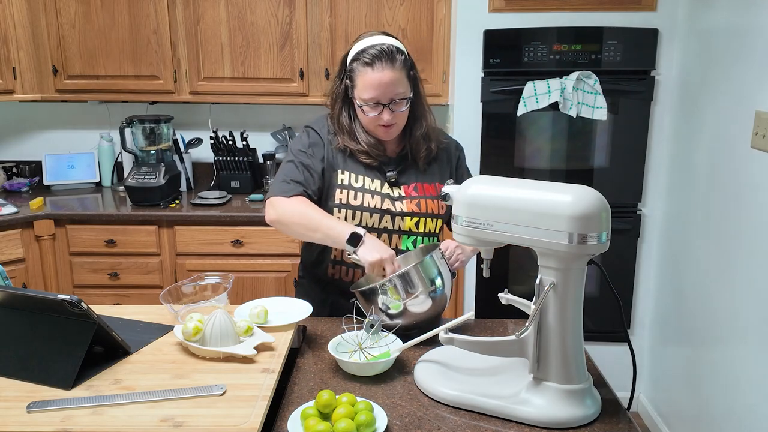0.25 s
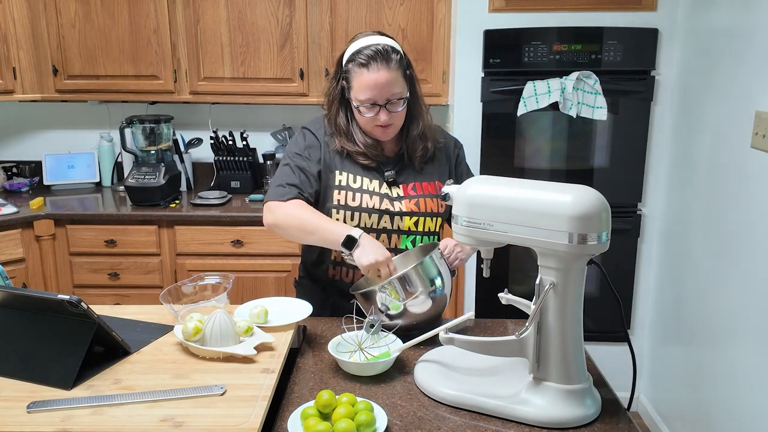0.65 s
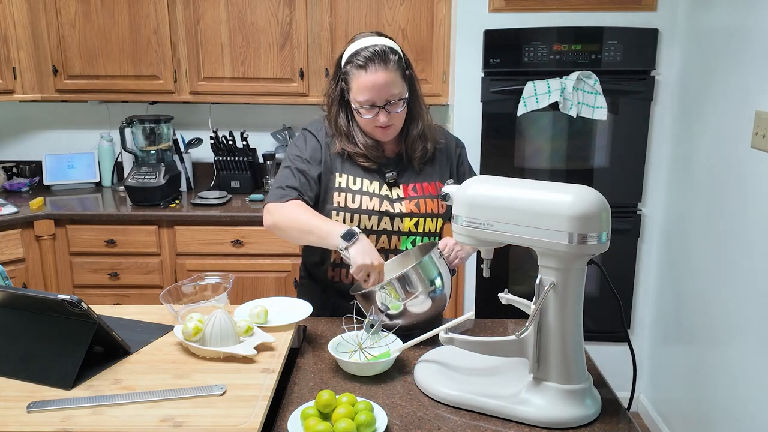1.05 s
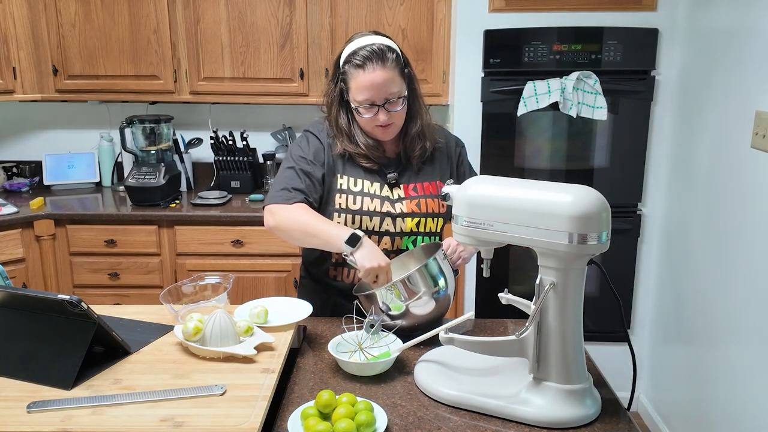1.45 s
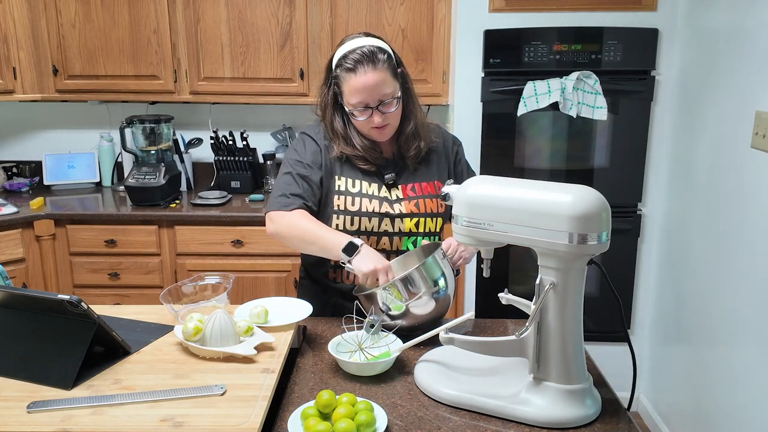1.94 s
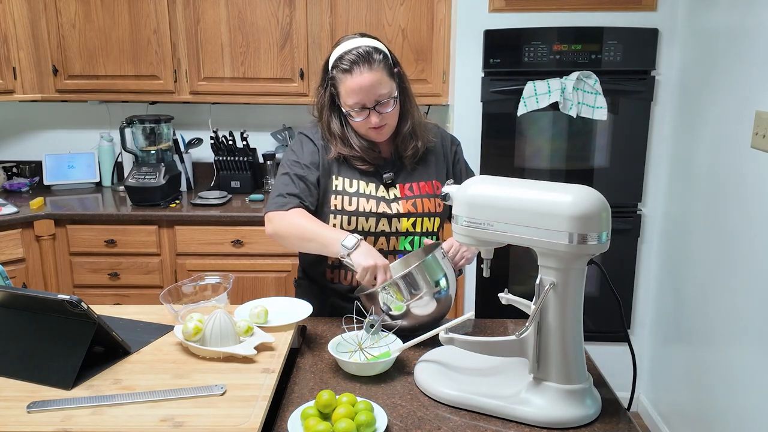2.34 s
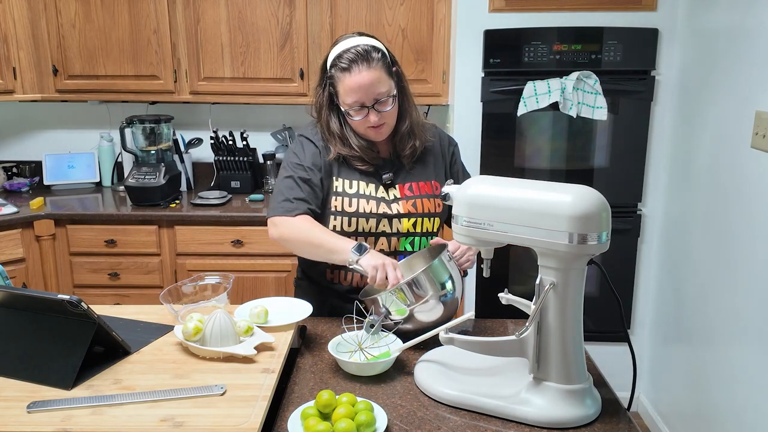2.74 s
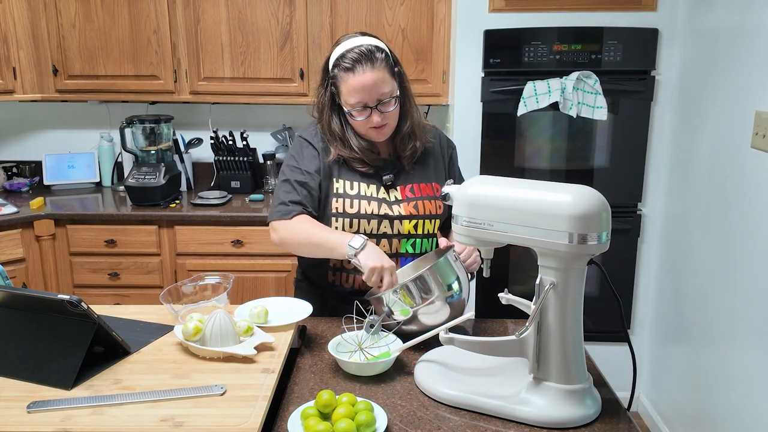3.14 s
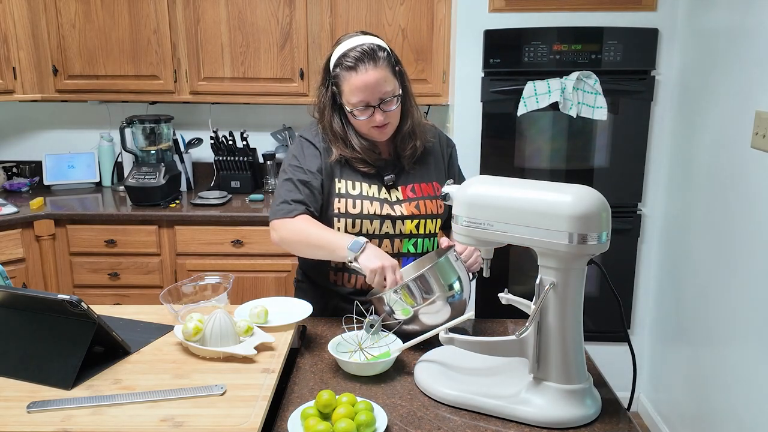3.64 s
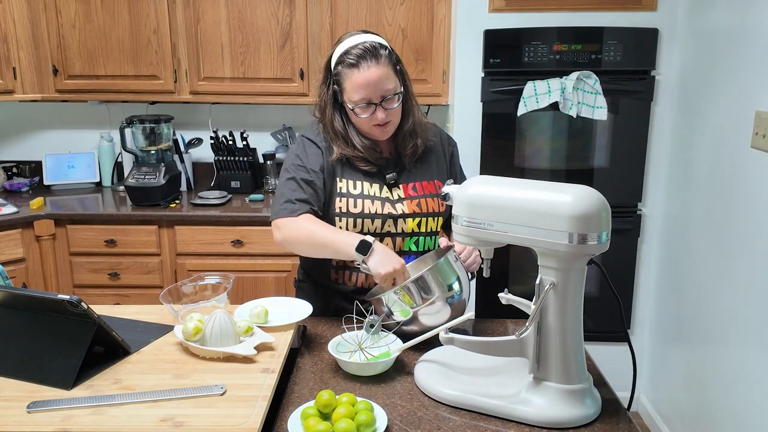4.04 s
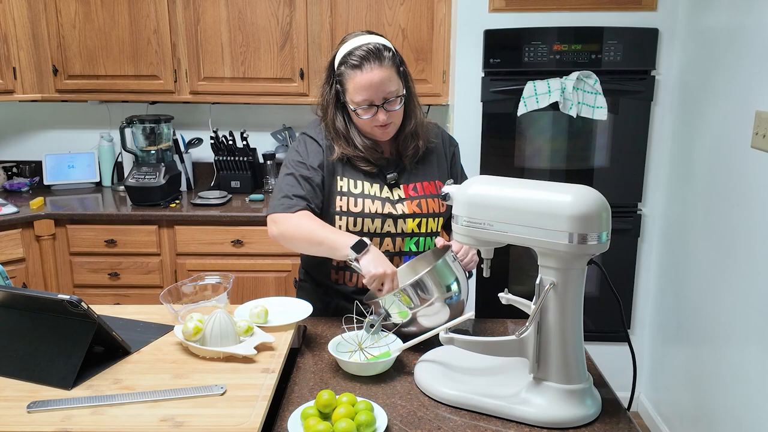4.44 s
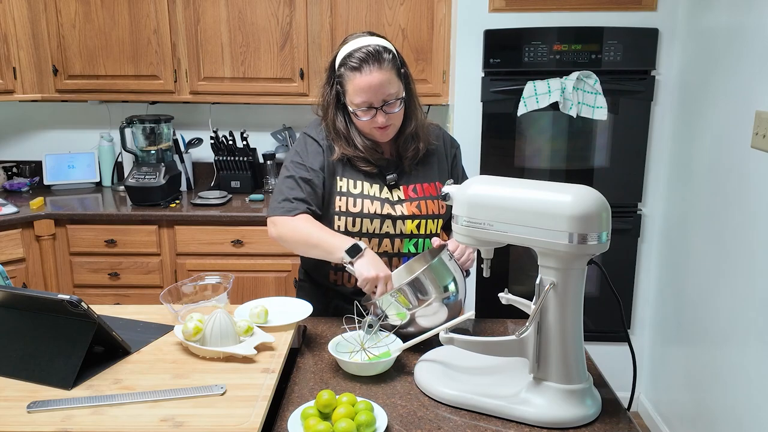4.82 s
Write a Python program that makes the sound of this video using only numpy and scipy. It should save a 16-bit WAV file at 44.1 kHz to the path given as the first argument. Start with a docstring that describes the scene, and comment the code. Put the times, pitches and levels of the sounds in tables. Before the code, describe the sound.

A wire whisk rapidly beats egg in a metal bowl, with rattling clinks, dull thuds and wet slaps in a small kitchen.

```python
"""A wire whisk beats eggs in a stainless steel bowl, in a home kitchen, for about five seconds.
From the start, quick blows of rattling wires make the bottom thud, the egg slap and the steel clink,
with sliding wires in between. Just before 3 s there is a deep bump, then mostly clinks and long sweeps;
wet slaps return near 3.9 s, and the strongest clink comes near the end. Each blow sets off resonances.
Bubbles pop all along, the room answers briefly, and soft air noise and a faint hum lie beneath."""
import sys
import numpy as np
from scipy import signal
from scipy.fft import rfft, irfft, next_fast_len
from scipy.io import wavfile

SR = 44100
rng = np.random.default_rng(int(sys.argv[2]) if len(sys.argv) > 2 else 0)


def store_pcm(level_fs):
    """Save levels as 16-bit WAV."""
    pcm = np.round(np.clip(level_fs, -1, 1) * 32767).astype(np.int16)
    wavfile.write(sys.argv[1], SR, np.atleast_2d(pcm).T)


N = 223975

# Ways the steel wall can ring. Each row: pitch in Hz, relative level in dB,
# time in seconds for its free ring to fall by 60 dB.
STEEL_MODES = [(1028, 11, 0.5), (1100, 16, 0.47), (1110, 5, 0.9), (1785, 19, 0.05), (2020, 13, 0.16),
               (2413, 18.5, 0.077), (2910, 11.5, 0.081), (3208, 20.5, 0.14), (3353, -3.5, 0.31),
               (4104, 11.5, 0.24), (5100, -35, 0.26), (4960, 5.5, 0.24), (5620, 0, 0.47), (5960, -15, 0.42),
               (6413, 13, 0.12), (6570, 10.5, 0.78), (7030, 5.5, 0.16), (6880, 17, 0.09), (7370, 5, 0.19),
               (8050, -34, .15), (8830, -1.5, 0.19), (8660, -27, .2), (10000, -42, .14)]
# Tone colours of a tick on steel, a slap in the egg, the thudding bottom, the clanking wall
# and the still air. Each row: frequency in Hz, relative level in dB.
TICK_COLOUR = [(1500, -56), (3400, -15.5), (4400, -8.5), (5200, 3), (6000, 0.5), (6800, -6), (8000, -4.5),
               (9800, -14.5), (13500, -14), (16000, -26.5)]
SLAP_COLOUR = [(40, -66), (130, -35), (205, 8), (290, -6), (380, 6), (600, -6), (770, -11.5), (1100, 1),
               (1600, -9), (2200, -5), (2760, -12.5), (3500, -15), (4600, -26), (6600, -49.5),
               (9000, -22.5), (16000, -31.5)]
BOTTOM_COLOUR = [(30, -94), (90, -3), (155, -19), (200, 7), (245, -6), (285, -9), (345, 2), (470, -2),
                 (590, -2.5), (740, -17.5), (1400, -69.5)]
CLANK_COLOUR = [(700, -47), (2200, -13), (2700, -19), (3050, -25.5), (3450, 3), (3900, -7.5), (4400, -32.5),
                (6000, -22), (12000, -63)]
AIR_COLOUR = [(25, -17), (60, -15), (130, -6.5), (200, 6.5), (293, -6.5), (420, 2.5), (714, -9.5),
              (1100, -9.5), (2500, -25), (4400, -23), (6700, -23.5), (9000, -33), (16000, -52.5)]
# Hum of an appliance. Each row: frequency in Hz, relative level in dB.
HUM_TONES = [(121, -77), (242, -68.5)]
# How long the room rings. Each row: frequency in Hz, time in seconds to fall by 60 dB.
ROOM_RING = [(150, 0.4), (400, 0.27), (1000, 0.28), (3000, 0.35), (7000, 0.37), (11000, 0.39),
             (16000, 0.26)]
# The wires hit bare steel. Each row: start in seconds, chatter length in seconds,
# clink and thud (both relative levels in dB), thud pitch in Hz.
CLINK_HITS = [(0.002, 0.0074, -45.5, -49.5, 400), (0.195, 0.014, -47, -49, 447),
              (0.322, 0.019, -51, -45, 447), (0.401, 0.0049, -39.5, -43.5, 378),
              (0.444, 0.026, -50, -44, 398), (0.631, 0.0046, -53, -42, 372), (0.64, 0.008, -38.5, -39, 392),
              (0.809, 0.015, -78, -44.5, 440), (0.847, .022, -40, -48.5, 403),
              (1.083, 0.021, -56, -45.5, 415), (1.211, 0.014, -43.5, -52, 435),
              (1.301, 0.006, -38.5, -42, 423), (1.438, 0.0104, -56.5, -55.5, 350),
              (1.4595, 0.0056, -38, -45, 335), (1.841, 0.013, -58, -48, 352),
              (2.014, 0.0088, -41.5, -45, 419), (2.221, 0.0076, -46.5, -42, 386),
              (2.320, 0.0046, -45.5, -53, 387), (2.582, 0.0038, -30.5, -30, 447),
              (2.587, 0.016, -40, -49, 453), (2.782, 0.016, -46, -49.5, 428),
              (3.091, 0.0043, -46.5, -43, 422), (3.0967, 0.0027, -38, -42, 400),
              (3.153, 0.011, -47.5, -52, 450), (3.344, 0.004, -47, -45, 374),
              (3.386, 0.0091, -36.5, -45, 422), (3.619, .017, -38, -39.5, 442),
              (3.641, 0.0085, -41.5, -39.5, 516), (3.785, 0.0053, -28, -74, 445),
              (3.793, 0.0083, -50.5, -38, 345), (4.018, 0.0024, -53, -47, 352),
              (4.030, 0.0066, -45.5, -45, 345), (4.223, 0.011, -44, -47.5, 417),
              (4.478, 0.0016, -57, -54, 364), (4.917, 0.0021, -24.5, -34.5, 372)]
# The wires plunge into the egg. Each row: start in seconds, chatter length in seconds,
# slap, steel and thud (all relative levels in dB), thud pitch in Hz, middle slap pitch in Hz.
EGG_HITS = [(0.06, 0.018, -34, -46, -40.5, 380, 1670), (0.257, 0.0087, -34.5, -42.5, -38, 381, 1600),
            (0.516, 0.0026, -38.5, -38.5, -34, 405, 1290), (0.706, 0.01, -45.5, -43, -33.5, 464, 1100),
            (0.869, 0.0043, -43.5, -65, -56, 377, 1700), (1.219, .008, -41.5, -60, -48, 405, 1875),
            (1.513, 0.0051, -42, -73, -61, 370, 1500), (1.523, 0.0095, -48.5, -51, -38, 406, 1430),
            (1.658, 0.0023, -45, -61, -43, 352, 1670), (1.716, 0.006, -36.5, -42, -39, 454, 1496),
            (1.73, 0.016, -51, -49, -41, 404, 1070), (1.888, 0.013, -42.5, -57, -40.5, 384, 1510),
            (1.915, 0.0077, -39, -42.5, -66, 376, 1610), (1.938, 0.012, -47, -48.5, -49, 400, 1080),
            (2.084, 0.019, -37.5, -51, -35, 337, 1420), (2.102, 0.015, -34, -41, -57, 332, 1640),
            (2.458, 0.0044, -31.5, -44.5, -39, 340, 1600), (2.537, 0.0041, -44.5, -54, -60, 358, 1280),
            (2.546, 0.0098, -50.5, -55, -62, 395, 1680), (2.903, 0.0065, -44.5, -48, -46, 338, 1620),
            (3.859, 0.0074, -42.5, -43.5, -46, 360, 1480), (3.871, .012, -45.5, -49, -45, 418, 2060),
            (4.087, 0.0072, -36.5, -43.5, -43, 363, 1560), (4.123, 0.0052, -39, -44, -56, 426, 1530),
            (4.362, 0.0062, -51, -51, -78, 382, 1930), (4.517, 0.012, -49.5, -62, -51, 515, 1660),
            (4.577, 0.0042, -38, -48.5, -36, 457, 1370), (4.718, 0.0059, -36, -56, -48, 430, 1006),
            (4.727, 0.007, -41, -43, -43.5, 493, 1560), (4.792, 0.0047, -38.5, -41.5, -33, 446, 1870),
            (4.879, .007, -37, -52, -41.5, 508, 1070), (4.968, 0.0056, -45.5, -48, -40.5, 446, 1410)]
# Long sweeps along the wall. Each row: start in seconds, length in seconds,
# steel, egg and thud (all relative levels in dB).
WALL_SWEEPS = [(0.084, .042, -51, -46, -56), (0.342, 0.037, -51.5, -62, -62),
               (0.468, 0.055, -57, -53, -48.5), (0.659, 0.046, -48, -54, -58),
               (0.822, 0.021, -46.5, -65, -51.5), (0.883, 0.034, -53.5, -56, -60),
               (2.284, 0.084, -59, -64.5, -54.5), (2.475, 0.048, -60, -57, -52),
               (2.827, 0.032, -47.5, -72, -71), (2.89, 0.016, -62, -61, -50),
               (3.132, 0.067, -55.5, -65.5, -51), (3.355, 0.042, -55, -77, -50),
               (3.406, .078, -50, -71.5, -52), (3.653, 0.041, -54, -72, -49), (4.044, 0.029, -55, -66, -53),
               (4.303, .063, -62, -56.5, -59), (4.534, 0.032, -53.5, -48, -65),
               (4.746, .045, -59.5, -56, -74), (4.896, 0.03, -57, -50.5, -50)]

RING = np.arange(SR // 4) / SR  # time axis of one ring, in seconds
TOP_HZ = 16100  # nothing sounds above this
CLANK_DB = -3  # the wall's clank, against the mean of clink and slap
# Egg clinging to the wires in a clink: level against the mean of clink and thud, and pitch
SPLASH_DB, SPLASH_HZ = -11.5, 1966
# Slaps harder than this have a soft entry and carry on along the wall
HARD_SLAP_DB = -44.5
# The leading wire enters the egg just ahead: seconds, and levels against the slap's own
ENTRY_S, ENTRY_EGG_DB, ENTRY_STEEL_DB, ENTRY_THUD_DB = 0.005, -9.5, -23, -14
# Drag after a slap: pause and length in seconds, then levels against the slap's own
DRAG_LAG_S, DRAG_S, DRAG_STEEL_DB, DRAG_EGG_DB = 0.008, 0.038, -16, -23.5
DRAG_THUD_DB, DRAG_EGG_HZ = -56.5, 1280  # relative level of the bottom and egg pitch in a drag
RUB_THUD_HZ, RUB_EGG_HZ = 430, 1866  # pitches of bottom and egg in a long sweep


def strikes():
    """The first wire lands hard and the others rattle after it; low modes of the bowl swing along."""
    def rattle(length):
        return chatter(length, rate=1100, scatter_db=4.5, fade_db=1.0, first_db=8)

    rows = contacts()
    out = bowl(rows, rattle, thud_db=-8, slap_db=-1, clank_db=-2, clink_db=-1, tick_db=-2)
    for s, length, thud, slap, _, _, thud_hz, _ in rows:
        add(out, s, thump(length, thud_hz, t60=0.072, db=thud - 2.5))
        # the slap rocks the whole bowl in the hand
        add(out, s, thump(length, hz=213.0, t60=0.098, db=slap - 15.5))
    return out


def scrapes():
    """Sliding wires catch and slip in tiny blows: in the long sweeps, and after every hard slap."""
    def slips(length):
        return chatter(length, rate=1100, scatter_db=2.5, fade_db=-0.5, first_db=3)

    sweeps = [touch(*row, RUB_THUD_HZ, RUB_EGG_HZ) for row in WALL_SWEEPS]
    drags = []
    for s, length, slap, steel_db, _, thud_hz, _ in EGG_HITS:
        if slap > HARD_SLAP_DB:
            start = s + length + DRAG_LAG_S
            drags.append(touch(start, DRAG_S, steel_db + DRAG_STEEL_DB, slap + DRAG_EGG_DB,
                               DRAG_THUD_DB, thud_hz, DRAG_EGG_HZ))
    return bowl(sweeps + drags, slips, thud_db=-2.5, slap_db=1.5, clank_db=-5, clink_db=-2.5, tick_db=3.5)


def contacts():
    """Clinks on steel also splash; a hard slap begins softly as its leading wire enters the egg."""
    clinks, slaps, entries = [], [], []
    for s, length, clink, thud, thud_hz in CLINK_HITS:
        splash = (clink + thud) / 2 + SPLASH_DB
        clinks.append(touch(s, length, clink, splash, thud, thud_hz, SPLASH_HZ))
    for s, length, slap, steel_db, thud, *pitches in EGG_HITS:
        slaps.append(touch(s, length, steel_db, slap, thud, *pitches))
        if slap > HARD_SLAP_DB:
            entries.append(touch(s - ENTRY_S, ENTRY_S, steel_db + ENTRY_STEEL_DB, slap + ENTRY_EGG_DB,
                                 thud + ENTRY_THUD_DB, *pitches))
    return clinks + slaps + entries


def touch(s, length, clink, slap, thud, thud_hz, slap_hz):
    """One contact of wires and bowl; the wall's clank follows the mean of its clink and its slap."""
    clank = (clink + slap) / 2 + CLANK_DB
    return s, length, thud, slap, clank, clink, thud_hz, slap_hz


def bowl(rows, force_of, thud_db, slap_db, clank_db, clink_db, tick_db):
    """Every touch drives the bottom, the egg and the wall, which ring in rising ranges of pitch."""
    out = np.zeros(N)
    low = steel(damped_t60=0.02, free_db=-13, low_hz=500, high_hz=2100)
    middle = steel(damped_t60=0.026, free_db=-25, low_hz=1600, high_hz=4300)
    high = steel(damped_t60=0.028, free_db=-28, low_hz=5500, high_hz=16000)
    for s, length, thud, slap, clank, clink, thud_hz, slap_hz in rows:
        forces = force_of(length)
        shifts = np.exp(rng.standard_normal((len(forces), 2)) * [0.1, 0.06])  # pitch factors per wire
        soft, firm, hard = (struck(modes, scatter_db=5) for modes in (low, middle, high))
        # each wire traps its own pocket of air in the egg and adds its own rasp and tick
        pockets, rasps, ticks = [], [], []
        for body_shift, tick_shift in shifts:
            pocket = resonant(SLAP_COLOUR, slap_hz * body_shift, width_hz=330, lift_db=17)
            pockets.append(amp(-12.5) * soft + smeared(pocket, t60=0.0041))
            rasp = resonant(CLANK_COLOUR, 3500 * body_shift, width_hz=250, lift_db=6)
            rasps.append(firm + amp(0.5) * smeared(rasp, t60=0.013))
            tick = resonant(TICK_COLOUR, 6700 * tick_shift, width_hz=450, lift_db=9)
            ticks.append(hard + amp(tick_db) * smeared(tick, t60=0.013))
        bottom = resonant(BOTTOM_COLOUR, thud_hz, width_hz=120, lift_db=8)
        add(out, s, excite(forces, [bottom], thud + thud_db))
        # the egg yields before it slaps
        squeeze = 1 - np.exp(-np.arange(1, forces.shape[1] + 1) / SR / 0.00037)
        add(out, s, excite(forces * squeeze, pockets, slap + slap_db))
        add(out, s, excite(forces, rasps, clank + clank_db))
        add(out, s, excite(forces, ticks, clink + clink_db))
    return out


def chatter(length, rate, scatter_db, fade_db, first_db, count=4):
    """Force on the wall, one row per wire: each lands in its turn and rattles at uneven moments."""
    u = np.linspace(0, 1, max(round(length * SR), 8))  # progress through the contact
    chance, size = rng.random(len(u)), rng.standard_normal(len(u))
    hits = (chance < rate / SR) * np.sign(size) * amp(scatter_db * np.abs(size))
    hits[0] = amp(first_db)
    turn = u * max(count, length / 0.005) + size / 2
    wire = np.floor(turn).astype(int) % count
    return hits * amp(-fade_db * u) * (wire == np.arange(count)[:, None])


def steel(damped_t60, free_db, low_hz, high_hz):
    """The wall's modes in one range, one per row: fast loss under the wires, then a faint free ring."""
    hz, db, t60 = np.transpose(STEEL_MODES)[:, :, None]
    reach = 1 / (1 + (hz / high_hz) ** 12 + (low_hz / hz) ** 4)
    decay = amp(-60 * RING / damped_t60) + amp(free_db - 60 * RING / t60)
    return reach * amp(db) * decay * np.sin(2 * np.pi * hz * RING)


def struck(modes, scatter_db):
    """Each spot on the wall favours a few modes of its own; the moving egg detunes them slightly."""
    size = rng.standard_normal(len(modes))
    weights = rng.choice([-1, 1], len(modes)) * amp(scatter_db * size)
    ring = weights @ modes
    return norm(np.interp(RING * rng.normal(1, 0.012), RING, ring))


def smeared(response, t60):
    """Bending waves spread a blow over a few milliseconds, differently for every wire."""
    t = RING[:SR // 30]
    spread = rng.standard_normal(len(t)) * amp(-60 * t / t60)
    sound = signal.fftconvolve(response, spread)
    return norm(np.pad(sound, (0, len(RING) - len(sound))))


def excite(forces, responses, db):
    """A part of the bowl driven by all wires, its level set over the contact and 3 ms beyond."""
    sound = signal.fftconvolve(forces, np.array(responses), axes=1).sum(axis=0)
    contact = sound[:forces.shape[1] + SR // 333]
    return amp(db) * sound / np.sqrt(np.mean(contact ** 2) + 1e-20)


def thump(length, hz, t60, db):
    """A low mode swings cleanly while the whisk presses on it, then egg and hand stop it."""
    rise = 1 - np.exp(-RING / 0.0012)
    swing = rise * amp(-60 * np.maximum(RING - length / 2, 0) / t60)
    return amp(db) * np.sqrt(2) * swing * np.sin(2 * np.pi * hz * RING)


def low_cut(x, cut_hz):
    """The deepest tones are weakened below the cut-off frequency."""
    return signal.sosfilt(signal.butter(2, cut_hz, "high", fs=SR, output="sos"), x)


def froth(rate, scatter_db, level_db):
    """Small bubbles and wet strands break at random moments as the egg keeps swirling."""
    sizes = np.minimum(rng.exponential(size=N), 2)
    pops = (rng.random(N) < rate / SR) * amp(scatter_db * sizes)
    pop_sound = resonant(SLAP_COLOUR, 5700, width_hz=690, lift_db=6.0)
    return amp(level_db) * unit(signal.fftconvolve(pops, pop_sound)[:N])


def bump(s, hz, t60, db):
    """A soft, deep bump as the bowl shifts: one low tone that dies away."""
    out = np.zeros(N)
    add(out, s, thump(0, hz, t60, db))
    return out


def kitchen(x, wet_db, walls_db, count=8):
    """Counter and cupboards throw early copies; a short tail of fading noise blurs the sound."""
    hz, t, z = signal.stft(rng.standard_normal(SR // 2), SR, nperseg=256)
    fade = amp(-60 * t / along(ROOM_RING, hz)[:, None])
    tail = signal.istft(z * fade, SR, nperseg=256)[1]
    rise = 1 - np.exp(-np.arange(len(tail)) / SR / 0.0011)
    room = amp(wet_db) * norm(tail * rise)
    delays = (rng.uniform(0.002, 0.018, count) * SR).astype(int)
    room[delays] += amp(walls_db) * rng.choice([-1, 1], count)
    return signal.fftconvolve(x, room)[:N]


def background(air_db, hum_db):
    """Still air of the room as coloured noise, and the mains hum of an appliance as steady tones."""
    colour = amp(along(AIR_COLOUR, np.fft.rfftfreq(N, 1 / SR)))
    air = irfft(rfft(rng.standard_normal(N)) * colour, N)
    hum = np.zeros(N)
    for hz, db in HUM_TONES:
        cycles = hz * np.arange(N) / SR + rng.random()
        hum += amp(db) * np.sqrt(2) * np.sin(2 * np.pi * cycles)
    return amp(air_db) * unit(air) + amp(hum_db) * hum


def resonant(points, hz, width_hz, lift_db, size=4096):
    """The answer to one sharp blow: a tone colour with one lifted resonance, starting at once."""
    f = np.fft.rfftfreq(size, 1 / SR)
    db = along(points, f) + lift_db / (1 + (2 * (f - hz) / width_hz) ** 2)
    # folding the cepstrum gives minimum phase: no sound before the blow
    cepstrum = irfft(np.log(amp(db)))
    cepstrum[1:size // 2] *= 2
    cepstrum[size // 2 + 1:] = 0
    return irfft(np.exp(rfft(cepstrum)))


def along(points, hz):
    """Read a value between (Hz, value) points on a log frequency axis."""
    f, v = np.transpose(points)
    return np.interp(np.log(hz + 1), np.log(f + 1), v)


def add(track, s, sound):
    """Mix a sound into the track at a time in seconds."""
    part = track[max(round(s * SR), 0):][:len(sound)]
    part += sound[:len(part)]


def amp(db):
    """Turn dB into an amplitude factor."""
    return 10 ** (np.asarray(db) / 20)


def unit(x):
    """Scale to an rms level of 1."""
    return x / np.sqrt(np.mean(x ** 2) + 1e-20)


def norm(x):
    """Scale to energy 1."""
    return x / (np.linalg.norm(x) + 1e-20)


def scene():
    """Whisk, bubbles and bump sound in the room, over the quiet background."""
    bubbles = froth(rate=90, scatter_db=5, level_db=-76)
    whisk = low_cut(strikes() + scrapes(), cut_hz=73) + bubbles
    dry = whisk + bump(s=2.94, hz=68.6, t60=0.1, db=-55)
    room = kitchen(dry, wet_db=-9.0, walls_db=-20.5)
    return (dry + room + background(air_db=-60.0, hum_db=1))[None]


def record(dry):
    """Keep nothing above the top frequency."""
    m = next_fast_len(N + SR // 4)
    kept = np.fft.rfftfreq(m, 1 / SR) < TOP_HZ
    return irfft(rfft(dry, m) * kept, m)[..., :N]


dry = scene()
out = record(dry)
store_pcm(out)
```